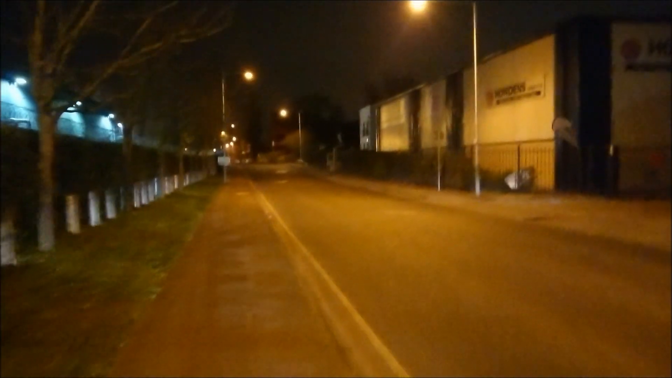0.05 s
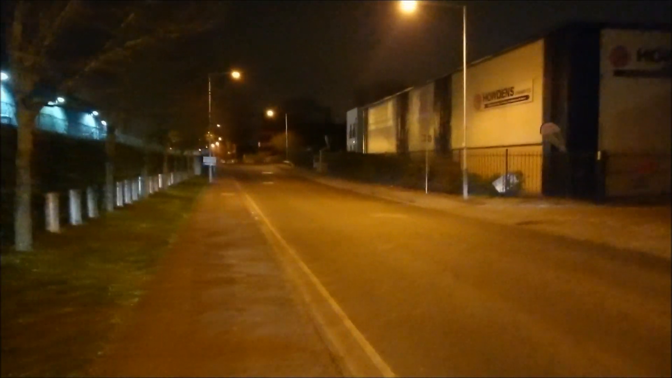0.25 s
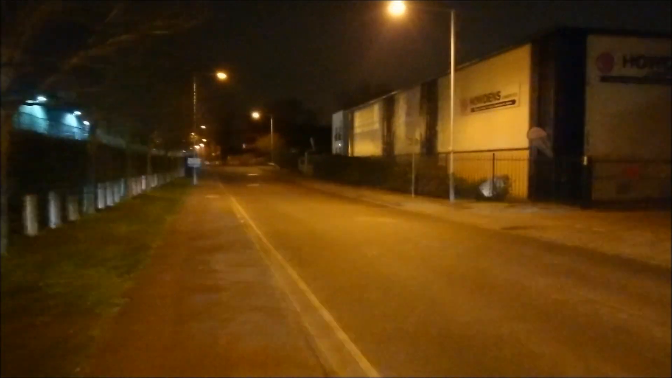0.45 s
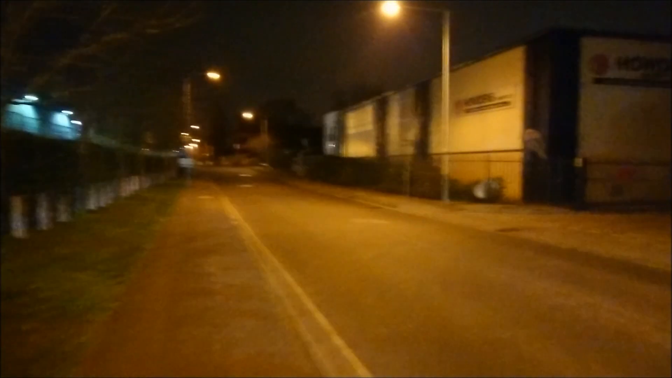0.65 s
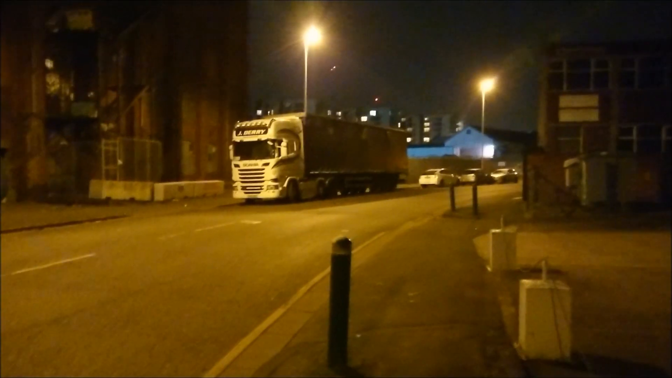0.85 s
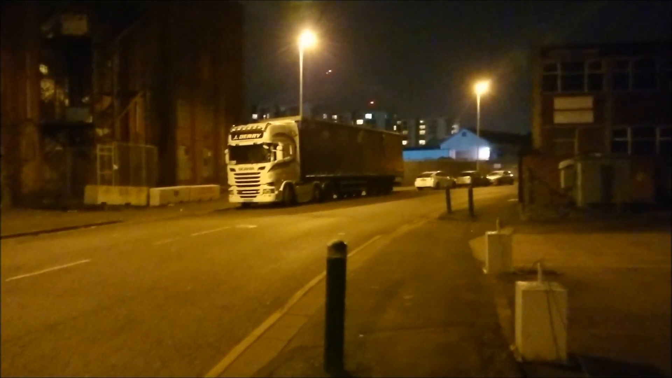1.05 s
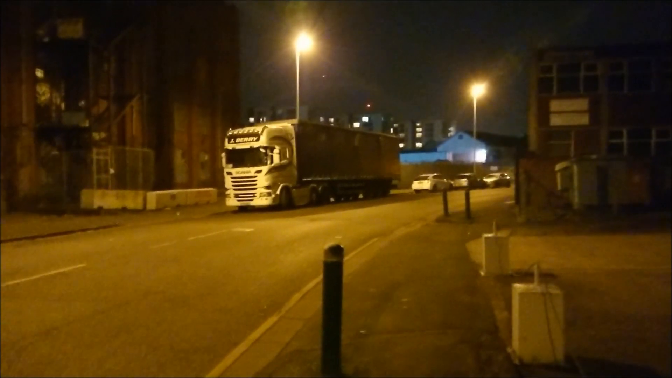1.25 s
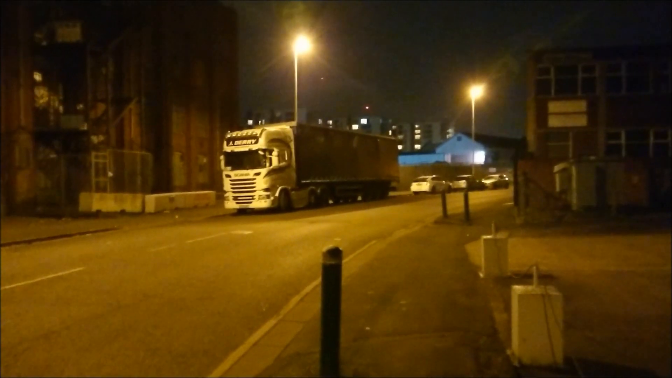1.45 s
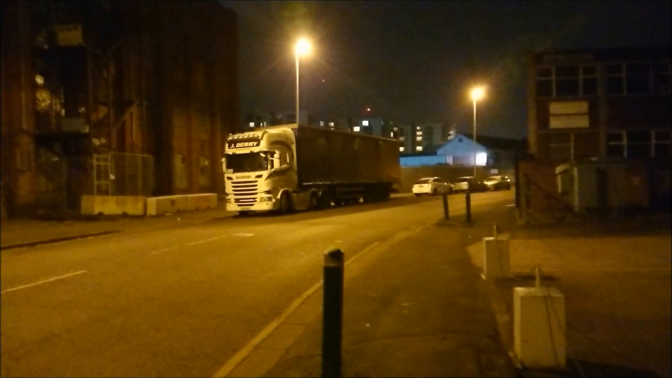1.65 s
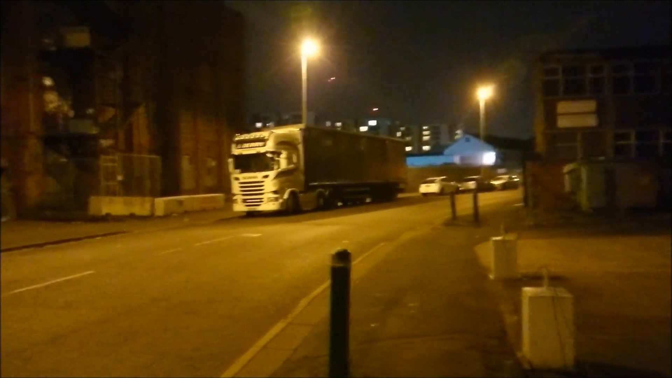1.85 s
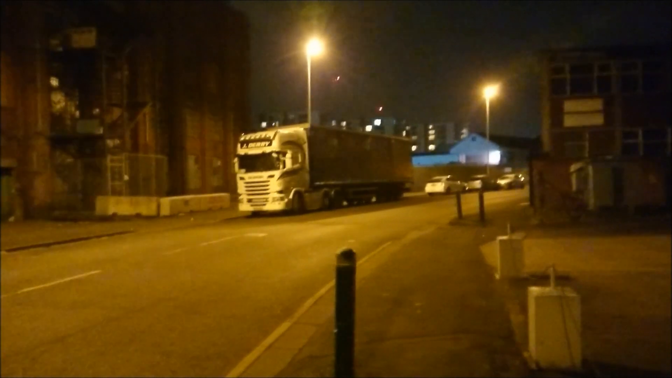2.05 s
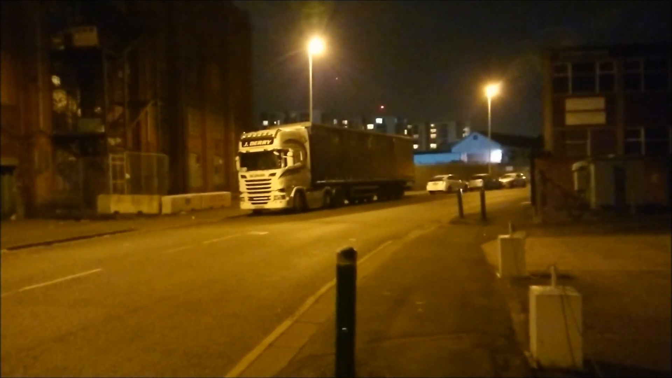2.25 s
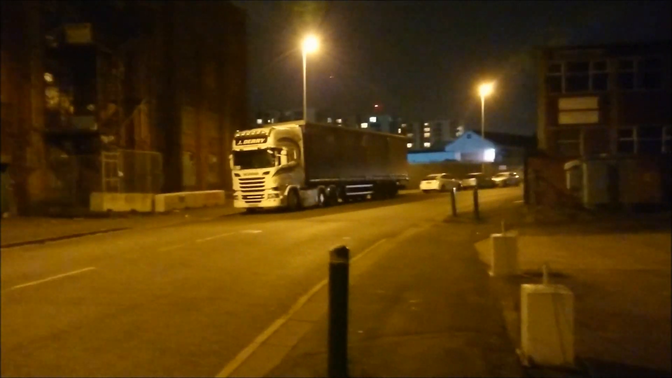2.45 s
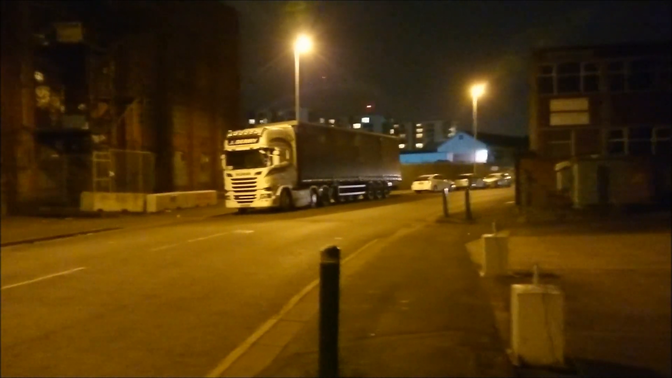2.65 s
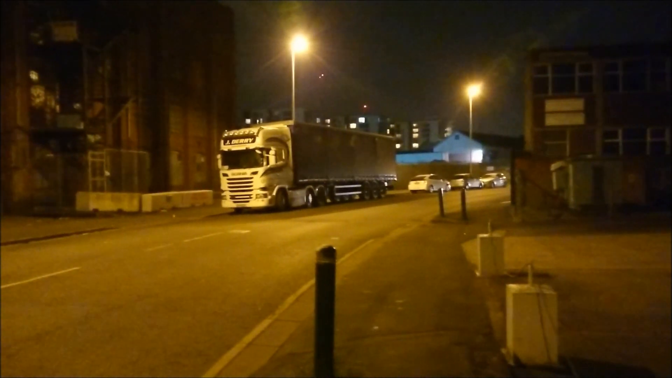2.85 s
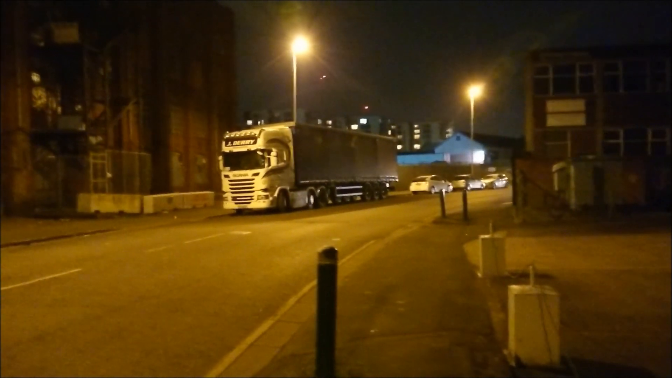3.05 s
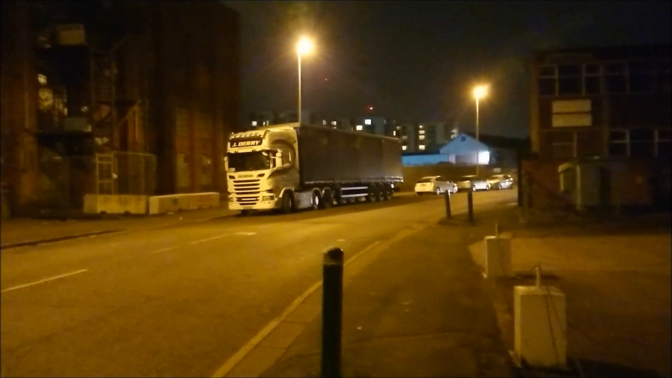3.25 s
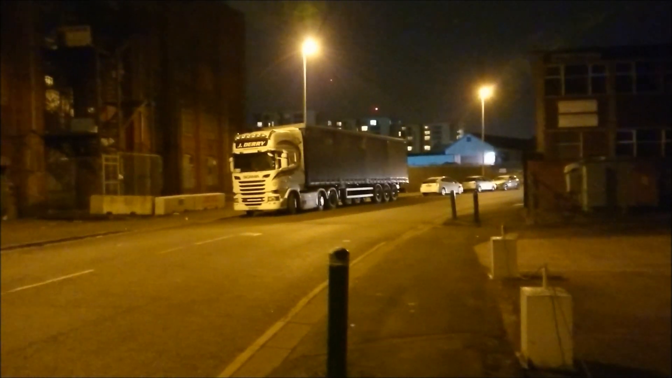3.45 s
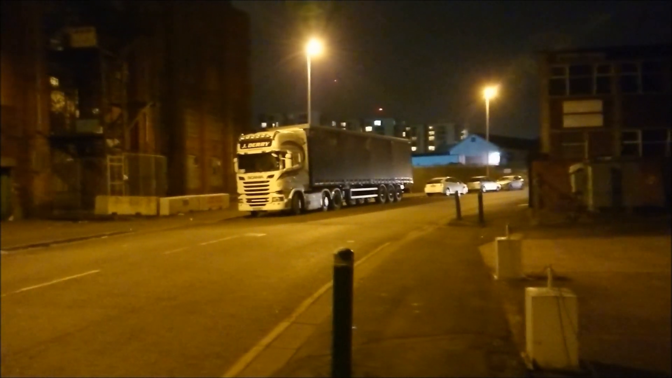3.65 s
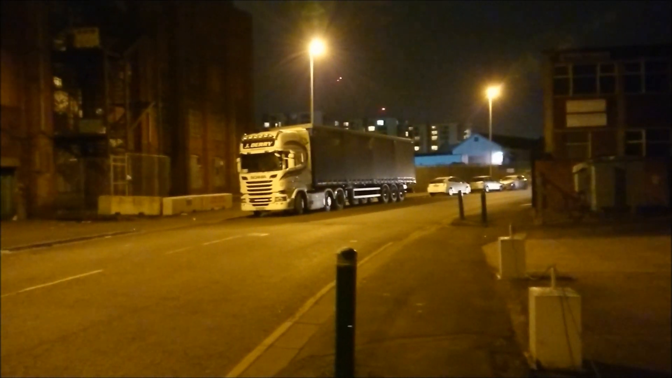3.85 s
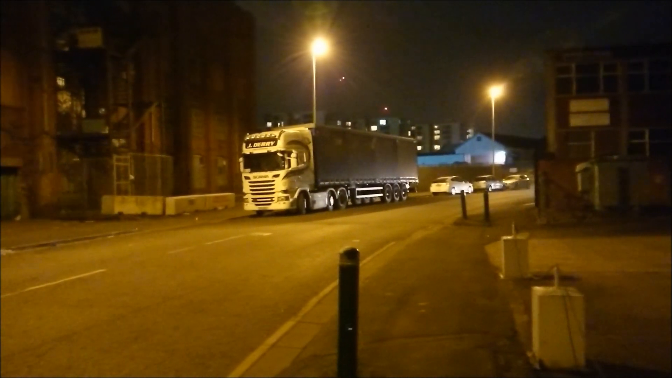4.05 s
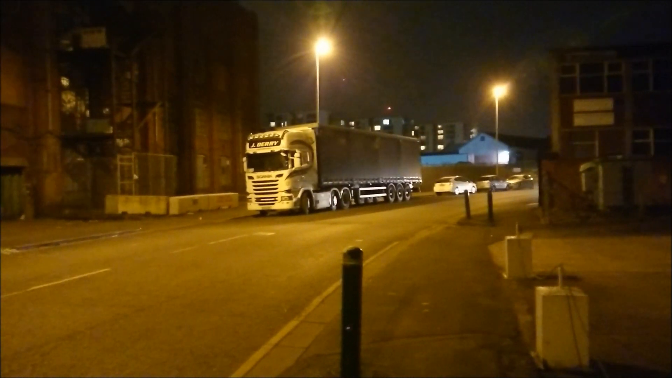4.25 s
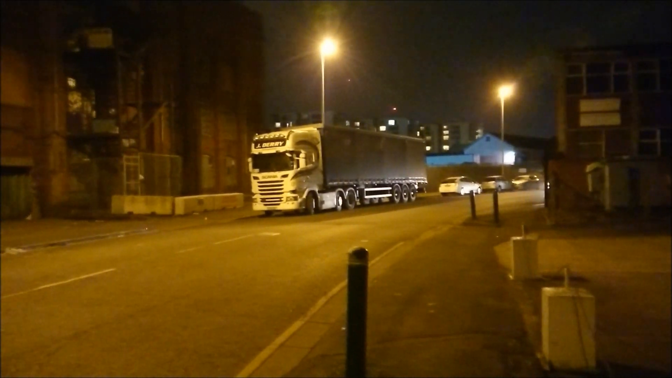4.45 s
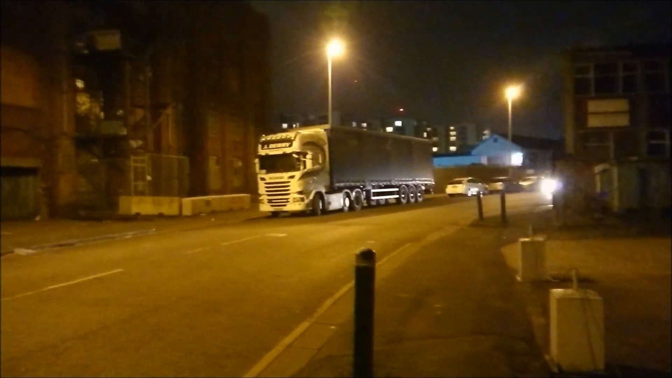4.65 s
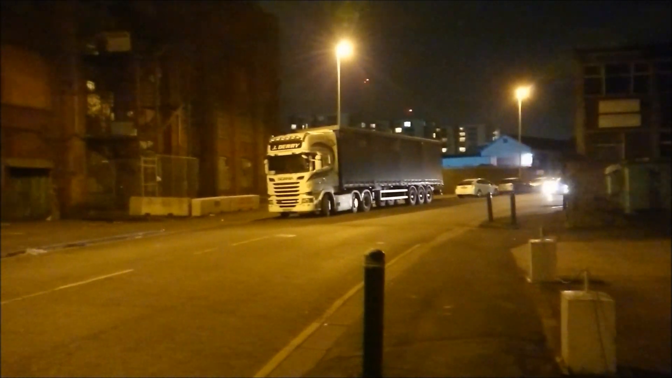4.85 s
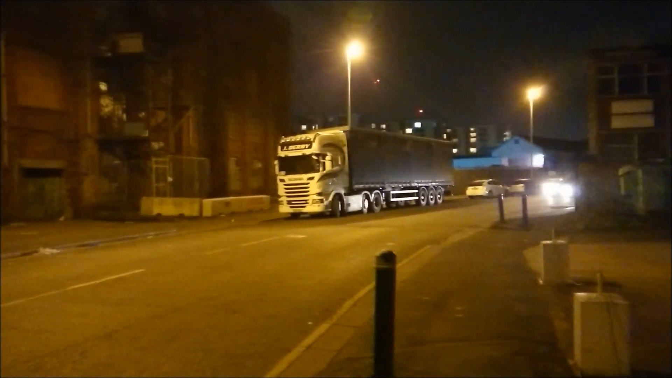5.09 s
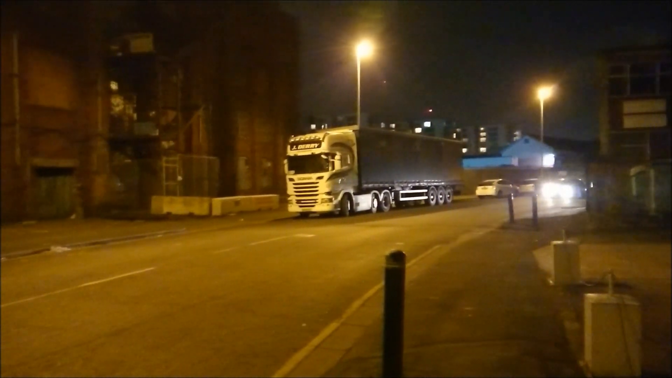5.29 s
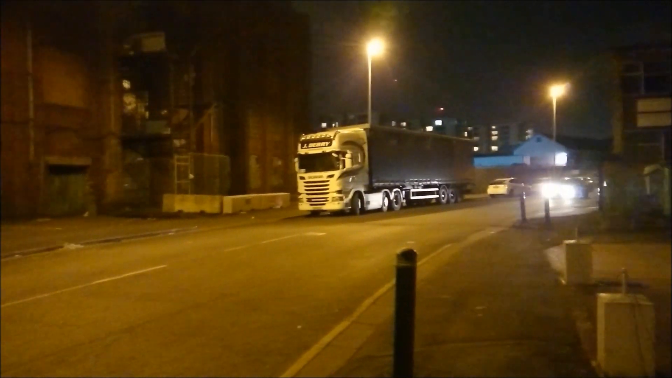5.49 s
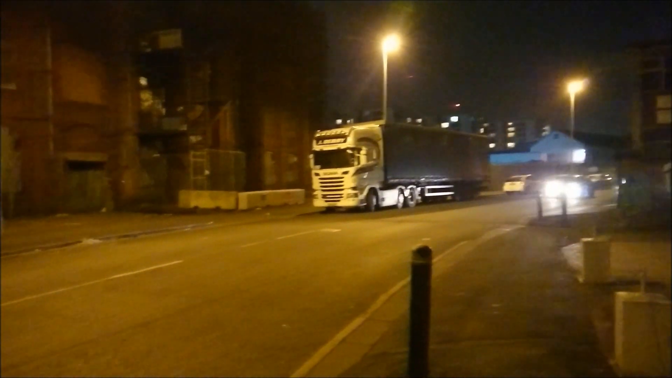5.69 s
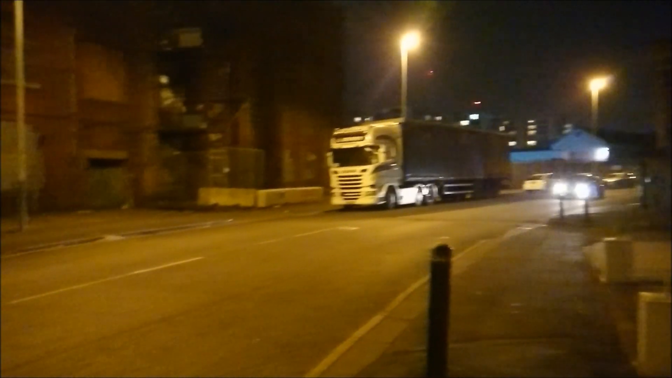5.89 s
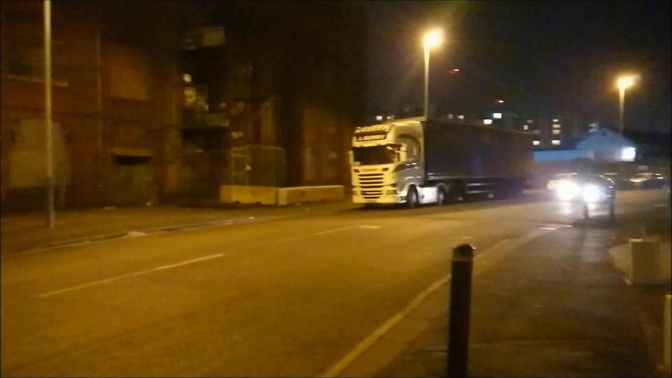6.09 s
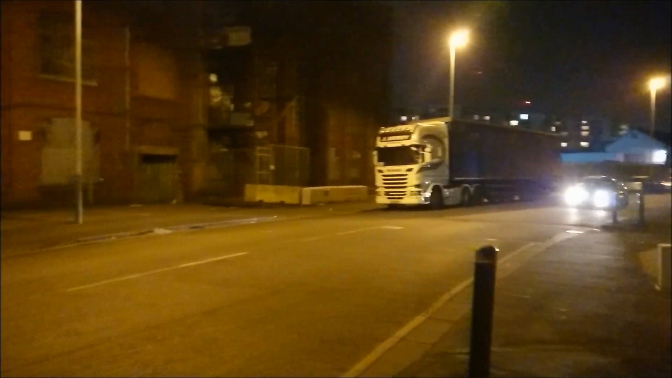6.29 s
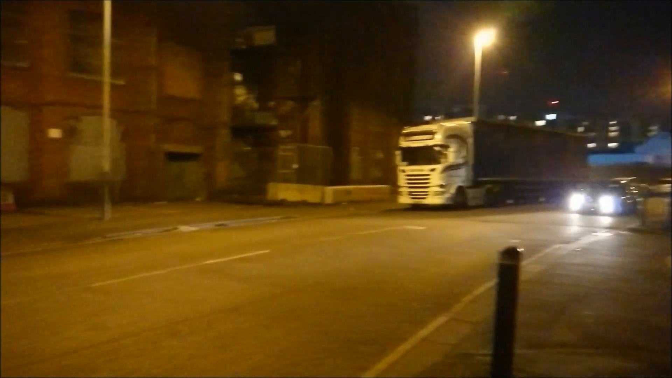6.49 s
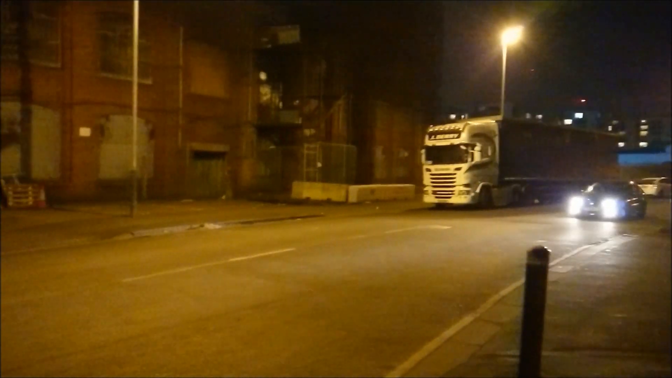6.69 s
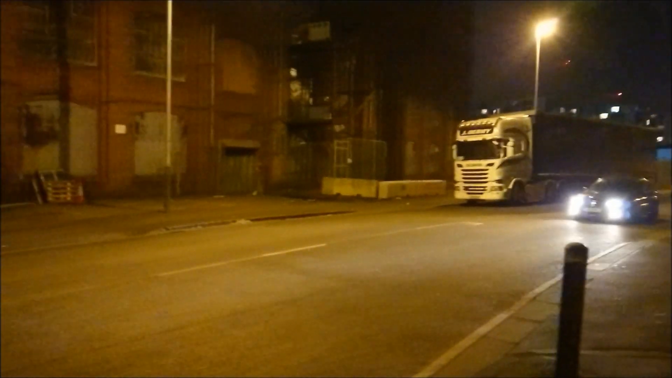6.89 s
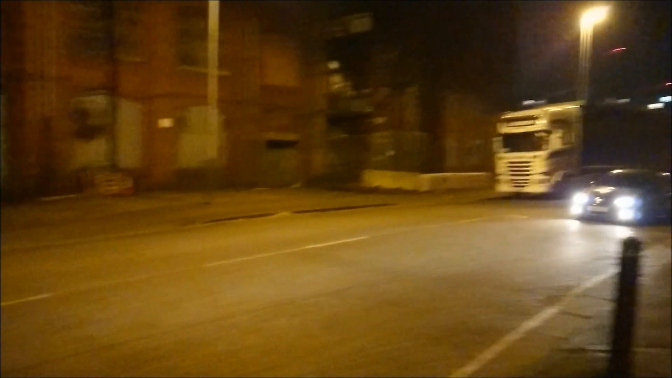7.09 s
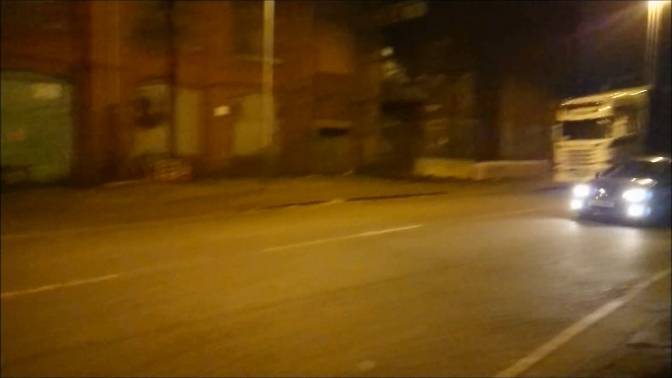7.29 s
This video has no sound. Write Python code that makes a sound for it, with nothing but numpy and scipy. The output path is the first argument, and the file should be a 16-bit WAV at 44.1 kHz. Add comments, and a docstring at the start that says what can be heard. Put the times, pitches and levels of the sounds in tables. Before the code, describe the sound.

A turbocharged car with a loud exhaust rasps away, then after a cut approaches from afar, pulling hard with whistling turbo and a puff of vented air.

```python
"""A night street, two scenes, one turbocharged four-cylinder car with a loud exhaust, on stereo microphones.
First it pulls away at high revs, tailpipe toward the microphones: rasping engine orders over a gas jet.
After a moment of dead silence and a tiny click, it comes from far off between buildings, over a low rumble:
it coasts, pulls, coasts, pulls hard with the turbo whistling, and lifts off with a puff of air, tyres roaring
up close. Engine notes are sums of wavering firing orders; tyres, gas and air are coloured noise."""
import sys
import numpy as np
from scipy import signal
from scipy.fft import rfft, irfft, next_fast_len
from scipy.io import wavfile
from scipy.ndimage import uniform_filter1d

SR = 44100
rng = np.random.default_rng(int(sys.argv[2]) if len(sys.argv) > 2 else 0)


def file_out(sig):
    """Save sig as 16-bit WAV at sys.argv[1]."""
    # one column per channel
    cols = np.atleast_2d(sig).T
    # limit, then scale
    lim = np.clip(cols, -1, 1)
    pcm = np.round(lim * 32767).astype(np.int16)
    wavfile.write(sys.argv[1], SR, pcm)


N = 323253
TIME = np.arange(N) / SR
AWAY_END_S, APPROACH_START_S = 0.781, 0.8415


def gain_of(db):
    """Decibels to amplitude."""
    return 10 ** (np.asarray(db) / 20)


def evened(x):
    """Scales to rms 1."""
    return x / np.sqrt(np.mean(abs(x) ** 2) + 1e-20)


def read(points, hz):
    """A spectrum's value at hz, on a log axis."""
    f, value = np.transpose(points)
    return np.interp(np.log(hz + 1), np.log(f + 1), value)


def follow(rows, t=TIME):
    """The columns of a curve table at the times t."""
    s, *columns = np.transpose(rows)
    return [np.interp(t, s, c) for c in columns]


def drift(rate_hz, t=TIME):
    """Slow random wandering of rms 1, up to about rate_hz."""
    size, step_rate_hz = 4096, 500
    f = np.fft.rfftfreq(size, 1 / step_rate_hz)
    slow = irfft(rfft(rng.standard_normal(size)) * np.exp(-.5 * (f / rate_hz) ** 2))
    return np.interp(t, np.arange(size) / step_rate_hz, evened(slow))


def partial(angle, rough, rate_hz, t=TIME):
    """A line of rms 1; the share rough of it arrives scattered by the street."""
    rough = np.clip(rough, 0, 1)
    steady = np.sqrt(2 * (1 - rough ** 2))
    in_phase = (steady + rough * drift(rate_hz, t)) * np.cos(angle)
    return in_phase + rough * drift(rate_hz, t) * np.sin(angle)


def airy_tone(hz, width_hz):
    """Two unrelated fuzzy whistles on one pitch."""
    angle = 2 * np.pi * np.cumsum(hz * np.ones(N)) / SR
    return np.array([partial(angle, 1, width_hz) for _ in range(2)])


def hiss(spectrum, gate=1):
    """Two unrelated noises of rms 1, chopped by gate and then given one colour."""
    size = next_fast_len(N)
    colour = gain_of(read(spectrum, np.fft.rfftfreq(size, 1 / SR)))
    noise = rfft(gate * rng.standard_normal((2, N)), size)
    return evened(irfft(noise * colour, size)[:, :N])


# Exhaust pipe resonances: hz, level_db
PIPE_COLOUR = [(150, 12), (230, 3.5), (300, 7), (350, -4), (425, 2.5), (490, -3), (590, 3), (700, -4),
               (850, -18), (1300, -48.5)]


def rasp(hz, level_db, load, coast_db=-7, half_db=-3, quarter_db=-4, gas_db=-7, swell_db=3, count=44):
    """Higher orders pass through the pipe's resonances, brighter with effort, with a puff of gas at each firing."""
    hz = uniform_filter1d(hz, size=SR // 8)
    turns, lines = np.cumsum(hz) / SR, np.zeros((2, N))
    for k in range(9, count):  # in quarters of the firing rate
        if k in (10, 12, 16, 20, 24):  # played by howl() and boom()
            continue
        kind_db = 0 if k % 4 == 0 else half_db if k % 2 == 0 else quarter_db
        order_hz = hz * k / 4
        angle = np.pi / 2 * k * turns + rng.uniform(0, 2 * np.pi)
        octaves_up = np.log2(np.maximum(order_hz / 400, 1))
        bright_db = (level_db + 27.5) * octaves_up
        size = gain_of(kind_db + swell_db * drift(4) + read(PIPE_COLOUR, order_hz) + bright_db)
        lines += size * np.array([partial(angle, .35, 7), drift(7) * np.sin(angle) * np.sqrt(2)])
    puffs = 1 + 0.4 * np.cos(2 * np.pi * turns)
    gas = hiss([(30, -48), (70, -13.5)] + list(PIPE_COLOUR) + [(5000, -60.0)], puffs)
    return gain_of(level_db) * (gain_of(coast_db * (1.5 - load)) * evened(lines) + gain_of(gas_db) * gas)


def howl(turns, levels_db, rough=0.34, swell_db=3.0, swell_hz=5):
    """The third to sixth firing orders, smeared by the pipe into a rounded wave."""
    sound = np.zeros(N)
    for k, db in enumerate(levels_db, 3):
        level = gain_of(db + swell_db * drift(swell_hz))
        sound += level * partial(2 * np.pi * k * turns + k * k, rough, 11)
    return np.array([sound, np.zeros(N)])


def boom(turns, first_db, second_db, burble_db, crank_db, upper_db=-8, swell_db=2.5, swell_hz=6):
    """The two lowest firing orders swell and fade; uneven cylinders burble between them."""
    angle = 2 * np.pi * turns
    sound = gain_of(first_db) * partial(angle, .06, 16)
    sound -= gain_of(second_db + swell_db * drift(swell_hz)) * partial(2 * angle, 0.41, 7)
    burble = partial(3 / 2 * angle, 0.29, 12.0) + gain_of(upper_db) * partial(5 / 2 * angle, 0.71, 30)
    sound += gain_of(burble_db) * burble
    # the crank-rate throb only radiates once it is above about 55 Hz
    radiates = signal.butter(10, 55, "high", fs=SR, output="sos")
    crank = signal.sosfilt(radiates, partial(angle / 2, .5, 8))
    return np.array([sound + gain_of(crank_db) * crank, np.zeros(N)])


# The boom, the lowest firing order, between its fades: time_s, level_db
BOOM_LEVEL = [(0.84, -28.5), (1.3, -20.5), (1.48, -25.5), (1.58, -51.5), (1.94, -32.5), (2.12, -40),
              (2.2, -32), (2.45, -14.5), (2.9, -10), (3.12, -22), (3.27, -21.5), (3.55, -29.5),
              (3.95, -33.5), (4.01, -30), (4.4, -20.5), (4.66, -29), (4.98, -14), (5.18, -20.5),
              (5.52, -11), (5.78, -14.5), (5.88, -8.5), (6.01, -6.5), (6.12, -19.5), (6.3, -12),
              (6.36, -17), (6.48, -11), (6.61, -10), (6.72, -17), (7.08, -15), (7.33, -35.5)]
# A wall echo cancels the boom as the car moves: time_s, half_width_s, depth_db
BOOM_FADES = [(1.022, 0.21, -40.5), (2.737, 0.37, -35.5), (3.42, 0.06, -24.5), (3.58, .02, -12),
              (3.745, .03, -18.5), (3.87, .02, -12), (4.49, 0.037, -23.5), (4.62, 0.029, -18.5),
              (4.831, 0.13, -30.5), (5.392, 0.066, -18.5), (5.689, 0.15, -26), (5.951, 0.046, -10),
              (6.23, .07, -22), (6.39, 0.018, -10.5), (6.56, 0.016, -8), (6.668, 0.023, -15),
              (6.77, 0.021, -9), (6.977, 0.062, -17.5), (7.199, 0.017, -31)]
# Pipe and street resonances and nulls that the second and third orders sweep through: pitch_hz, width_hz, level_db
STREET_DRONES = [(108.2, 19, 12.5), (132.2, 10.4, 12.5), (146, 4.6, -4), (188.8, 23, 6), (219.15, 7.7, -6),
                 (227, 6.8, 8), (266.7, 11, -6), (298.5, 14, 6.5), (345, 30, 3), (413.4, 25.6, 16.5),
                 (445, 17, -2)]
# The tailpipe's honk, reached by the fourth order at top revs: pitch_hz, width_hz, level_db
TAILPIPE_HONK = (578, 80, 17.5)
# The pipe's mid resonance, which orders four to six cross at lower revs: pitch_hz, width_hz, level_db
PIPE_THROAT = (400, 150, 3.2)


def resonance_db(order_hz, peaks):
    """Summed level in dB that resonances lend to an order at its moving pitch."""
    return sum(db / (1 + (2 * (order_hz - f) / width) ** 2) for f, width, db in peaks)


def order_levels(hz, near_db, load, lug_db, second_db=-28, third_db=-32.5, fourth_db=-42, fifth_db=-35.5,
                 sixth_db=-47.0, lug_gain=3.8, coast_db=-14, carry=0.52, second_carry=0.38, fifth_carry=0.87):
    """Levels of the six lowest firing orders: the boom fades in echoes, the others follow throttle and resonances."""
    first_db = follow(BOOM_LEVEL)[0]
    for s, half_s, depth_db in BOOM_FADES:
        dip = (1 - gain_of(depth_db) ** 2) / (1 + ((TIME - s) / half_s) ** 2)
        first_db = first_db + 10 * np.log10(1 - dip)
    drive_db = coast_db * (1 - load) + lug_db
    effort_db = carry * near_db + drive_db
    second_db = second_db + second_carry * near_db + drive_db + resonance_db(2 * hz, STREET_DRONES)
    third_db = third_db + effort_db + load * resonance_db(3 * hz, STREET_DRONES)
    fourth_ring_db = resonance_db(4 * hz, [TAILPIPE_HONK, PIPE_THROAT])
    fourth_db = fourth_db + effort_db + fourth_ring_db + lug_gain * lug_db
    fifth_db = fifth_db + fifth_carry * near_db + drive_db + resonance_db(5 * hz, [PIPE_THROAT])
    sixth_db = sixth_db + effort_db + resonance_db(6 * hz, [PIPE_THROAT])
    return first_db, second_db, third_db, fourth_db, fifth_db, sixth_db


# Burble between the firing orders: time_s, level_db
BURBLE_LEVEL = [(0.84, -40.5), (1.6, -39), (2.0, -46), (2.4, -57), (3.2, -61), (3.4, -44), (3.9, -41),
                (4.3, -57.5), (4.95, -37), (5.3, -49), (6.0, -48), (7.33, -54)]
# below this firing rate the engine lugs, and each blow is heavier
LUG_HZ, LUG_DB_PER_HZ = 59.7, 0.3117
# firings come early or late (firing cycles, rms) and unevenly strong (dB, rms), changing this fast
FIRING_JITTER, FIRING_SPREAD_DB, FIRING_CHANGE_HZ = .008, 1.8, 24


def exhaust(hz, near_db, load, boost, crank_db=-43, crank_coast_db=-4, boom_echo_db=-20, howl_echo_db=-14,
            rasp_echo_db=-3, rasp_db=-27.5, rasp_coast_db=-7, rasp_boost_db=8, rasp_carry=0.87):
    """It booms, burbles and rasps, loudest under throttle; firings vary, and the street lets the notes linger."""
    coast = 1 - load
    lug_db = LUG_DB_PER_HZ * np.maximum(LUG_HZ - hz, 0)
    pipe_db = rasp_db + rasp_carry * near_db + rasp_coast_db * coast + rasp_boost_db * boost + lug_db
    turns = np.cumsum(hz) / SR + FIRING_JITTER * drift(FIRING_CHANGE_HZ)
    strength = evened(gain_of(FIRING_SPREAD_DB * drift(FIRING_CHANGE_HZ)))
    first_db, second_db, *upper_db = order_levels(hz, near_db, load, lug_db)
    low = boom(turns, first_db, second_db, follow(BURBLE_LEVEL)[0], crank_db + crank_coast_db * coast)
    high = street(strength * howl(turns, upper_db), howl_echo_db)
    high = high + street(strength * rasp(hz, pipe_db, load), rasp_echo_db)
    return street(low, boom_echo_db) + off_walls(high)


# Throttle openings: open_s, shut_s (it begins to shut), share of full throttle
THROTTLE_PULLS = [(1.514, 2.8, 0.78), (3.958, 6.664, 0.95)]
THROTTLE_OPEN_S, THROTTLE_SHUT_S = 0.046, 0.27


def throttle():
    """0 while coasting, up to each pull's share; it opens quickly and shuts more slowly."""
    load = np.zeros(N)
    for start, end, share in THROTTLE_PULLS:
        opening = np.clip((TIME - start) / THROTTLE_OPEN_S, 0, 1)
        load += share * opening * np.clip(1 - (TIME - end) / THROTTLE_SHUT_S, 0, 1)
    return load


# Tyre roar, which carries far: hz, level_db (per Hz)
TYRE_ROAR = [(30, -34.5), (70, 10), (300, 2), (600, -3.5), (1000, -1.5), (1250, -7), (1850, -2.5),
             (2350, -4.5), (2750, -17.5), (3200, -42.5), (4400, -24), (5200, -39), (6500, -47.5),
             (14000, -64.5)]
# The tread's rush up close: hz, level_db (per Hz)
TREAD_RUSH = [(100, -10.5), (400, -16), (750, 5), (1080, 6.5), (1400, -5), (2200, 3.5), (2800, -3),
              (4000, -38), (8000, -40)]


def tyres(level_db, roar_db=2, tread_db=-5):
    """A roar that carries far, and the tread's mid-range rush that gains on it up close."""
    closer_db = 0.23 * (level_db - level_db.max())
    tread = gain_of(tread_db + level_db + closer_db) * hiss(TREAD_RUSH)
    return tread + gain_of(roar_db + level_db + .5 * drift(23)) * hiss(TYRE_ROAR)


# The turbo's whine in the intake, sliding down as boost builds: time_s, pitch_hz, level_db
INTAKE_WHINE = [(4.3, 4760, -100), (4.65, 4776, -66), (5.2, 4620, -69), (5.4, 4390, -58), (5.68, 4200, -54),
                (5.77, 3903, -50), (6.22, 3900, -52), (6.6, 3948, -100)]
# the whistle: its loudest moment, pitch and level there, its rise, and its fall in level to either side
WHISTLE_S, WHISTLE_HZ, WHISTLE_DB, WHISTLE_HZ_PER_S, WHISTLE_DB_PER_S2 = 6.34, 9530, -50.5, 1600, 87
# a faint rising chirp as the turbo wakes
CHIRP_S, CHIRP_WIDTH_S, CHIRP_HZ, CHIRP_HZ_PER_S, CHIRP_DB = 4.28, .045, 5380, 3000, -79


def turbo():
    """A chirp, an intake whine and the compressor's blades, which whistle higher as boost builds."""
    t = np.clip(TIME - WHISTLE_S, -1, 1)
    whistle_hz = (WHISTLE_HZ + WHISTLE_HZ_PER_S * t) * (1 + .011 * drift(60))
    whistle = gain_of(WHISTLE_DB - WHISTLE_DB_PER_S2 * t ** 2) * airy_tone(whistle_hz, 150)
    whine_hz, whine_db = follow(INTAKE_WHINE)
    whine = gain_of(whine_db) * airy_tone(whine_hz, 110)
    u = np.clip(TIME - CHIRP_S, -1, 1)
    chirp_level = gain_of(CHIRP_DB) * np.exp(-(u / CHIRP_WIDTH_S) ** 2)
    return whistle + whine + chirp_level * airy_tone(CHIRP_HZ + CHIRP_HZ_PER_S * u, 40)


# Turbo rush of air: hz, level_db (per Hz)
TURBO_WHOOSH = [(1500, 0), (2800, -4.5), (3400, -4), (4000, -2), (4650, -2), (5200, -10.5), (6200, -28),
                (9000, -43.5)]


def whoosh(near_db, load, boost, level_db=-44, carry=0.86, spool_db=5, spool_s=0.46, boost_db=-6):
    """Air rushes while the turbo spools up behind the throttle, and eases once boost stands."""
    keep = np.exp(-1 / (spool_s * SR))
    spool = signal.lfilter([1 - keep], [1, -keep], load)
    whoosh_db = level_db + carry * near_db + spool_db * spool + boost_db * boost + 0.83 * drift(22)
    return gain_of(whoosh_db) * hiss(TURBO_WHOOSH)


# Vented air: hz, level_db (per Hz)
VENT_PUFF = [(1500, -17), (2500, 4), (3300, -16), (3900, -2), (4450, -5), (4700, -6), (5000, -9),
             (7000, -20), (13000, -23)]
# Tones of the venting pipe: pitch_hz, level_db
VENT_PIPE_TONES = [(2330, -37.5), (2650, -42), (4700, -45.5)]
VENT_S, VENT_ATTACK_S, VENT_DB, VENT_FALL_DB_PER_S = 6.645, 0.078, -35, 29
VENT_TONE_DELAY_S, VENT_TONE_FALL_DB_PER_S = 0.021, 38


def valve():
    """Boost vents when the throttle shuts: a puff of air, and the tones of its pipe."""
    age = np.maximum(TIME - VENT_S, 0)
    puff_db = VENT_DB - VENT_FALL_DB_PER_S * age + 1.9 * drift(20.5)
    puff = np.minimum(age / VENT_ATTACK_S, 1) * gain_of(puff_db)
    ring = np.clip((age - VENT_TONE_DELAY_S) / .01, 0, 1) * gain_of(-VENT_TONE_FALL_DB_PER_S * age)
    tones = sum(gain_of(db) * airy_tone(hz, 35) for hz, db in VENT_PIPE_TONES)
    return puff * hiss(VENT_PUFF) + ring * tones


# Air drawn into the intake: hz, level_db (per Hz)
INTAKE_HISS = [(1000, -20), (3000, 9), (5200, 1), (6800, -6.5), (8000, -8), (9400, -3), (10300, -9),
               (11500, -21.5), (14000, -31)]
# The intake's top fizz: hz, level_db (per Hz)
INTAKE_FIZZ = [(7000, -27), (9500, -2.5), (11000, 1), (13000, -3.5), (14000, 0)]
# The car rounds the corner and its treble is no longer screened: time_s, level_db
CORNER_SCREEN = [(4.05, -18), (4.65, -4), (5.6, 4)]
RUN_DOWN_S = 0.42  # the turbo's decay time after boost


def intake(near_db, boost, hiss_db=-55, fizz_db=-60.0, boost_db=7, carry=0.32):
    """Air sucked in, harder under boost; its highest fizz is absorbed at a distance."""
    run_down = np.exp(-TIME / RUN_DOWN_S)
    spin = np.maximum.accumulate(boost / run_down) * run_down  # rises with boost, then decays
    level_db = carry * near_db + follow(CORNER_SCREEN)[0] + boost_db * spin + .5 * drift(25)
    fizz = gain_of(fizz_db + level_db + 0.5 * (level_db - level_db.max())) * hiss(INTAKE_FIZZ)
    return fizz + gain_of(hiss_db + level_db) * hiss(INTAKE_HISS)


# Approaching engine: time_s, firing_rate_hz
ENGINE_SPEED = [(0.84, 84.54), (1.15, 79.15), (1.45, 71.64), (1.53, 64.53), (1.58, 48.64), (1.78, 48.5),
                (2.08, 61.9), (2.34, 65.44), (2.6, 74.53), (2.86, 85.4), (3.05, 88.2), (3.3, 88),
                (3.72, 76.04), (3.8, 58.15), (3.95, 55.75), (4.03, 62.16), (4.17, 63), (4.42, 69.14),
                (4.73, 75.2), (5.18, 88.72), (5.6, 102.5), (5.9, 114.3), (6.06, 124.3), (6.59, 149.2),
                (6.86, 135.9), (7.33, 125.2)]
# How well the car is heard, through distance and the gaps between buildings: time_s, level_db
CAR_NEARNESS = [(0.86, -56.5), (0.89, -54), (1.47, -55.5), (3.11, -45), (3.76, -49), (4.12, -48),
                (6.46, -26.5), (6.77, -29), (7.33, -25.5)]
# Low rumble between the walls: hz, level_db (per Hz)
WALL_RUMBLE = [(20, -36), (32, -38), (45, -10), (62, 14), (90, 0.5), (130, 7), (200, 0), (300, -8.5),
               (600, -19.5), (1500, -68)]
# Microphone balance: hz, left_minus_right_db
NEAR_LEAN = [(60, -4), (350, -6), (650, -9), (950, -8), (1300, -9.5), (1800, -18.5), (2300, -26),
             (2800, -7), (3300, -6.5), (4500, 0.5), (9500, -1), (12500, 7)]
# Microphone likeness: hz, left_right_likeness (1 = identical)
NEAR_LIKENESS = [(60, 0.81), (280, 0.86), (610, 0.72), (1300, 0.18), (3000, 0.13), (13000, .3)]
CLOSE_DB = -27  # the nearness counted as 0 dB
# under throttle the turbo builds boost around this firing rate
BOOST_HZ, BOOST_SPREAD_HZ = 97.2, 1.6


def approaching(tyres_db=-27, rumble_db=-41):
    """Exhaust, tyres and intake grow as the car nears, each by its own share (carry), over the walls' low rumble."""
    hz, load = follow(ENGINE_SPEED)[0], throttle()
    near_db = follow(CAR_NEARNESS)[0] - CLOSE_DB
    boost = load / (1 + np.exp((BOOST_HZ - hz) / BOOST_SPREAD_HZ))
    rush = past_lorry(tyres(tyres_db + near_db) + whoosh(near_db, load, boost) + valve())
    car = exhaust(hz, near_db, load, boost) + rush + intake(near_db, boost) + turbo()
    return microphones(car + gain_of(rumble_db) * hiss(WALL_RUMBLE), NEAR_LEAN, NEAR_LIKENESS, lag_s=.00013)


def ringing_phases(levels_db):
    """Phases that make a set of harmonics a sharp blow followed by the pipe's ring (minimum phase)."""
    outline_db = uniform_filter1d(np.pad(levels_db, (1, 40), constant_values=min(levels_db)), size=3)
    log_gain = np.log(gain_of(outline_db))
    return -signal.hilbert(np.concatenate([log_gain, log_gain[-2:0:-1]])).imag[1:]


# Engine pulling away: time_s, cycle_rate_hz
AWAY_CYCLES = [(0, 41.15), (0.15, 41.8), (0.45, 42.65), (0.78, 43.75)]
# Its orders, every fourth a firing order: multiple of the cycle rate, level_db
AWAY_LINES = [(1, -25), (2, -10), (3, -10), (4, -1), (5, -18), (6, -21), (7, -10), (8, -1), (9, -17),
              (10, -16), (11, -12), (12, -9), (13, -7), (14, -9), (15, 1), (16, .5), (17, -10), (18, -7),
              (19, -4), (20, -8), (21, -12), (22, -14), (23, -11), (24, -17), (25, -20)]
# Orders that swell or sink as it leaves: multiple, start_db, halfway_db, end_db
AWAY_LINE_SWELLS = [(3, 4, -2, -5), (4, -1, -4, 3), (8, 1, -3, 3), (12, -5, 2, -1), (13, -2, 2, -1),
                    (14, -6, 3, -1), (15, 2, -2, 1), (16, -1, .5, 2), (17, 7, -6, -5), (20, -2, -4, 6)]
# Gas jet at the tailpipe: hz, level_db (per Hz)
TAILPIPE_JET = [(25, -36), (60, 11.5), (250, -1.5), (700, 9), (1050, 2.5), (1300, -1.5), (1850, -3.5),
                (2400, -18.5), (3600, -19), (4050, -16), (4800, -24), (6000, -36.5), (9000, -45),
                (13500, -44.5)]
# Microphone balance: hz, left_minus_right_db
AWAY_LEAN = [(60, -1.5), (110, -6.5), (200, -5), (360, -7), (670, -6.5), (1210, -12), (2220, -4),
             (4040, -2), (7380, -2), (13500, 10.5)]
# Microphone likeness: hz, left_right_likeness (1 = identical)
AWAY_LIKENESS = [(60, 1), (600, 0.6), (1300, 0.1), (2900, 0.11), (13500, 0)]
# share of the bark that arrives scattered: at first, added per order, added per second, and for firing orders
BLUR, BLUR_PER_ORDER, BLUR_PER_S, FIRING_BLUR = .24, .008, .23, .18
# the loud cylinder's blow against its ring, its spread from stroke to stroke, and the pipe's smear (radians)
STROKE_DB, STROKE_SPREAD_DB, PIPE_STRETCH = -3, 1.0, .036


def going_away(bark_db=-20, jet_db=-27, jet_db_per_s=-2, bark_puff=0.044, firing_puff=0.1):
    """One cylinder differs from the rest, so all multiples of the cycle rate sound; strokes vary in strength."""
    t = TIME[:SR]
    turns = np.cumsum(follow(AWAY_CYCLES)[0]) / SR - .14
    bark_turns = turns[:SR]
    multiples, levels_db = np.transpose(AWAY_LINES)
    knots_s = [0, AWAY_END_S / 2, AWAY_END_S]
    swells = {round(k): np.interp(t, knots_s, db) for k, *db in AWAY_LINE_SWELLS}
    bark = np.zeros(SR)
    for k, db, phase in zip(multiples, levels_db, ringing_phases(levels_db)):
        # wall echoes blur the bark more as the car leaves; the firing orders carry best
        rough = FIRING_BLUR if k % 4 == 0 else BLUR + BLUR_PER_ORDER * k + BLUR_PER_S * t
        stretch = PIPE_STRETCH * (k - 14) ** 2  # the pipe stretches each blow
        angle = 2 * np.pi * k * bark_turns + phase - stretch
        bark += gain_of(db + swells.get(k, 0)) * partial(angle, rough, 9, t)
    cycle = np.round(bark_turns).astype(int)
    blow = np.cos(np.pi * (bark_turns - .04)) ** 8
    stroke_db = STROKE_DB + STROKE_SPREAD_DB * rng.standard_normal(cycle.max() + 1)[cycle]
    bark *= gain_of(stroke_db * blow)
    bark = np.pad(gain_of(bark_db) * evened(bark), (0, N - SR))
    # the gas leaves in puffs, one a firing, strongest once a cycle
    puffs = 1 + bark_puff * np.cos(2 * np.pi * turns - .7)
    puffs *= 1 + firing_puff * np.cos(8 * np.pi * turns)
    jet_level_db = jet_db + jet_db_per_s * (TIME - AWAY_END_S / 2) + .5 * drift(6.2)
    jet = gain_of(jet_level_db) * hiss(TAILPIPE_JET, puffs)
    return microphones(np.array([bark, np.zeros(N)]) + jet, AWAY_LEAN, AWAY_LIKENESS)


# Echo off the parked lorry as the car passes it: time_s, delay_s, share
LORRY_COMB = [(6.2, 0.0041, 0), (6.75, .003, 0.12), (7.33, 0.00232, 0.11)]


def past_lorry(pair):
    """One close echo whose shrinking delay sweeps a comb through the rush."""
    delay_s, share = follow(LORRY_COMB)
    echo = np.array([np.interp(TIME - delay_s, TIME, x) for x in pair])
    return (pair + share * echo) / np.sqrt(1 + share ** 2)


# House fronts answer the upper orders, each with its own Doppler shift: start_delay_s, end_delay_s, level_db
HOUSE_FRONTS = [(0.021, 0.047, -13), (0.13, 0.095, -10)]


def off_walls(pair):
    """Late copies whose changing delays shift their pitch: they crowd each order and beat against it."""
    echoes = 0
    for first_s, last_s, db in HOUSE_FRONTS:
        sent = TIME - np.linspace(first_s, last_s, N)
        echoes = echoes + gain_of(db) * np.array([np.interp(sent, TIME, x) for x in pair])
    return (pair + echoes) / np.sqrt(1 + sum(gain_of(db) ** 2 for *_, db in HOUSE_FRONTS))


def street(pair, wet_db, t60_s=0.9, taps_per_s=2000):
    """Adds the dying echoes between the house fronts: sparse taps of random sign."""
    signs = rng.choice([-1., 1.], (2, SR))
    taps = signs * (rng.random((2, SR)) < taps_per_s / SR) * gain_of(-60 * TIME[:SR] / t60_s)
    taps /= np.linalg.norm(taps, axis=1, keepdims=True)
    return pair + gain_of(wet_db) * signal.fftconvolve(pair, taps, axes=1)[:, :N]


def microphones(pair, balance, likeness, lag_s=0):
    """Blends two unrelated versions of a sound into left and right by balance and likeness; left hears it lag_s later."""
    size = next_fast_len(N + 4096)
    hz, (a, b) = np.fft.rfftfreq(size, 1 / SR), rfft(pair, size)
    same, lean = np.clip(read(likeness, hz), -.9, 1), gain_of(read(balance, hz))
    shared, apart = a * np.sqrt((1 + same) / 2), b * np.sqrt((1 - same) / 2)
    late = np.exp(-2j * np.pi * hz * lag_s)
    ports = np.array([lean * late * (shared + apart), shared - apart])
    # the mean of left and right keeps the level of the source
    return irfft(2 * ports / np.sqrt(1 + lean ** 2 + 2 * same * lean * late.real), size)[:, :N]


def night_hush():
    """The night's quiet air: steady, mostly low and middle noise."""
    return gain_of(-54) * hiss([(30, -12.0), (700, 2.0), (5000, -37.0), (14000, -44.0)])


def start_click(level_db=-42, decay_s=.0005):
    """A tiny click with an exponential tail, at the start of the second scene."""
    return gain_of(level_db) * np.exp(-abs(TIME - APPROACH_START_S) / decay_s)


def scene():
    """The two scenes, with dead silence between; the second starts with a tiny click over the night's hush."""
    first = np.clip((AWAY_END_S - TIME) / .001, 0, 1)
    second = TIME >= APPROACH_START_S
    return going_away() * first + (approaching() + night_hush() + start_click()) * second


def record(dry):
    """Rounds off the highest peaks softly, then limits the band to 14 kHz."""
    knee, room = .65, .24
    core = np.clip(dry, -knee, knee)
    rounded = core + room * np.tanh((dry - core) / room)
    low_pass = signal.firwin(511, 14000, window=("kaiser", 9), fs=SR)
    return signal.oaconvolve(rounded, low_pass[None], "same")


dry = scene()
out = record(dry)
file_out(out)
```